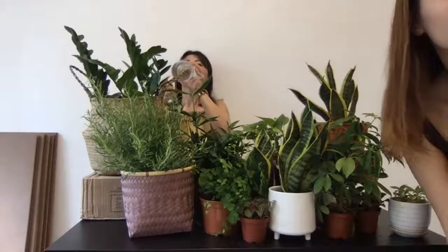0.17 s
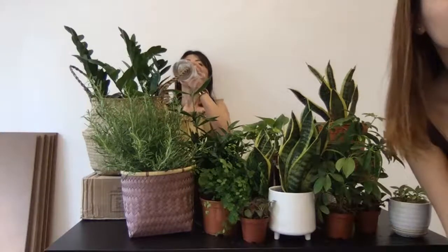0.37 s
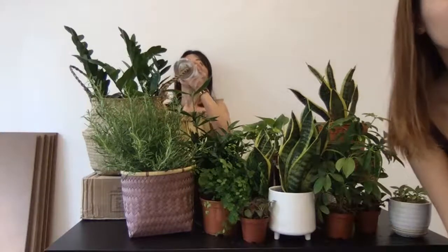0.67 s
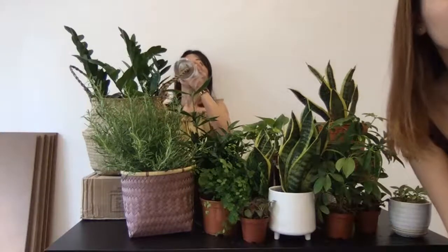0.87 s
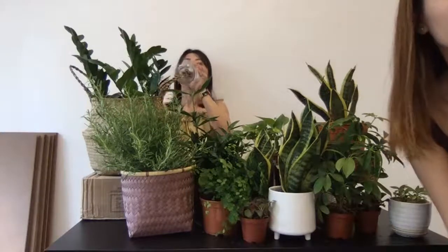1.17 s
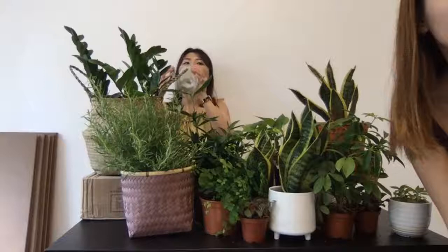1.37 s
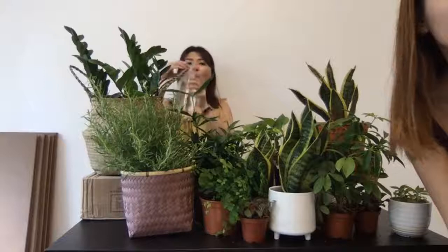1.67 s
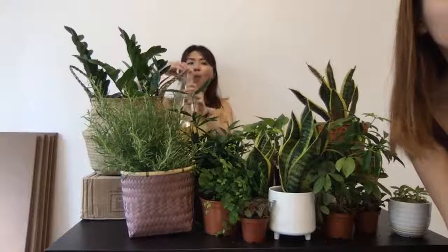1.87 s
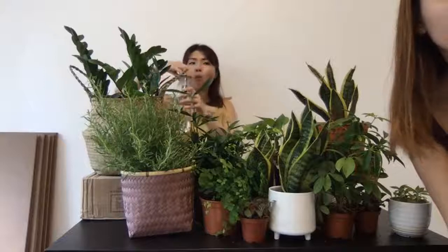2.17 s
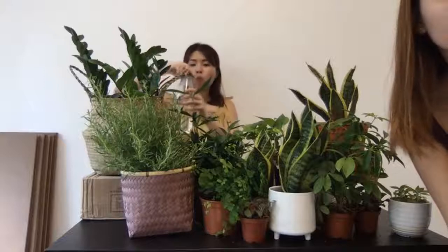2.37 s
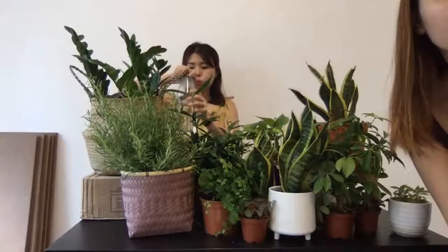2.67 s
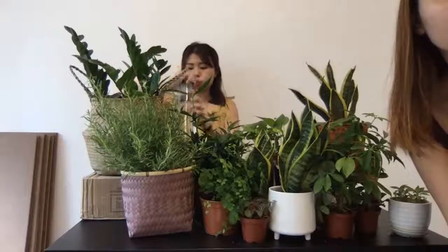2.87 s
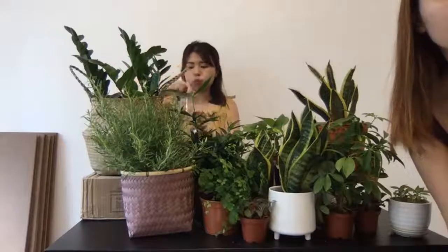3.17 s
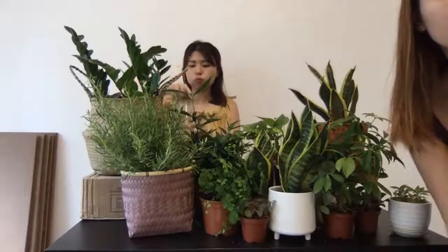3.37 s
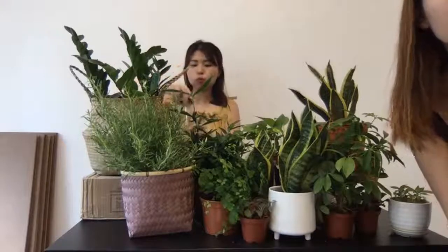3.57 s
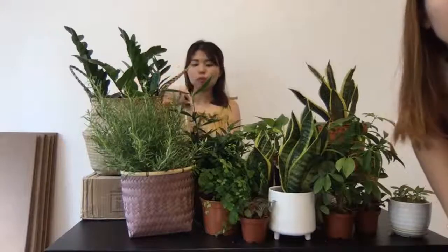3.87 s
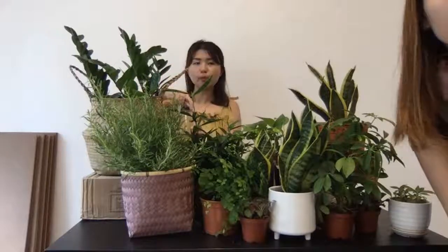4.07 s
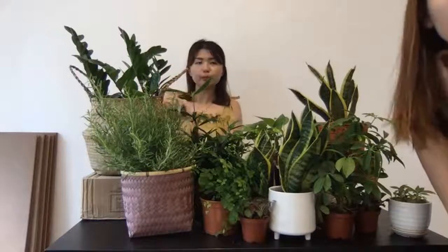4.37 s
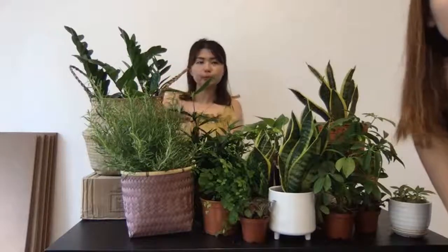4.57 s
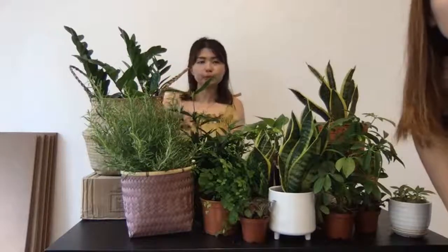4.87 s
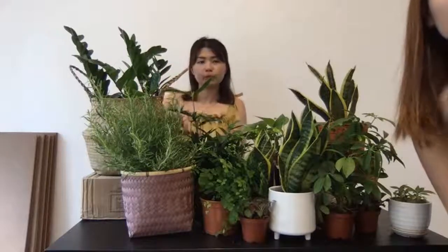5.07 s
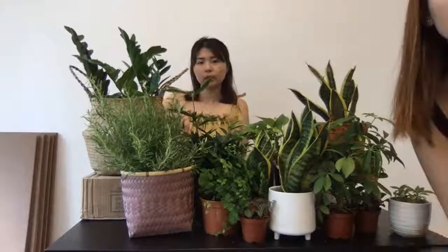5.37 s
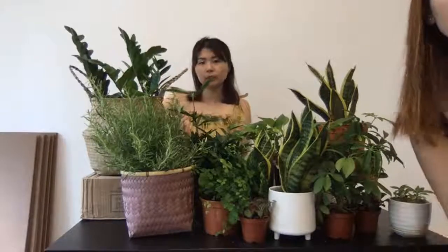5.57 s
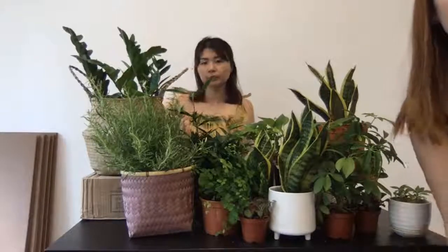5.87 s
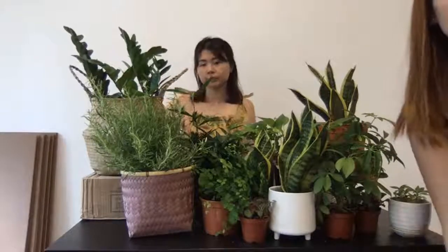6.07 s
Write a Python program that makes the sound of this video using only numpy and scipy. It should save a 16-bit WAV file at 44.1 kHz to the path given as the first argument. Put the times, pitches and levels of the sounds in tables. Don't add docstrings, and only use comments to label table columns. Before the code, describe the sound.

Faint squeak and glass handling clicks, then two rattling, ringing set-downs on wood, a dull hard knock, a soft tap and tiny snaps.

```python
import sys
import numpy as np
from scipy import signal
from scipy.fft import rfft, irfft, next_fast_len
from scipy.io import wavfile
from scipy.ndimage import uniform_filter1d, map_coordinates

SR = 44100
rng = np.random.default_rng(int(sys.argv[2]) if len(sys.argv) > 2 else 0)


def bounce(signal):
    frames = np.transpose(np.atleast_2d(signal))
    limited = np.clip(frames, -1, 1)
    pcm = np.round(limited * 32767).astype(np.int16)
    wavfile.write(sys.argv[1], SR, pcm)


def boost(x):
    u = np.asarray(x, float) / 20
    return 10 ** u


N = 273640
TIME = np.arange(N) / SR

# (time [s], level [dB])
ROOM_LEVEL = [(0, -78), (.55, -79.5), (.65, -64), (.9, -76.5), (1.42, -75.5), (1.6, -59), (1.95, -56),
              (2.5, -57.5), (2.95, -68.5), (3.4, -74), (3.6, -52.5), (3.8, -57), (4.3, -68), (4.75, -59.5),
              (5.1, -65.5), (5.48, -81), (5.75, -62), (6.2, -64.5)]
# (time [s], level [dB], gate closes after [s], brightness [dB/kHz])
KNOCK_BLOWS = [
    (5.53, -26, .006, -0.68),
    (5.534, -13.5, 0.14, -1.3),
]
# (frequency [Hz], level in first clink [dB], level in second clink [dB], extra fade [dB/s])
UPPER_RINGS = [(473, -7, -14, -8), (1093, -8, -20, 20), (1217, -14, -9, 25), (1330, -4, -19.5, 25),
               (1550, 1, -6, 19.5), (1561, -14, 6, 19.5), (3690, -8, -22, 30), (4274, -6, -5, 22),
               (4323, -12, -1, 22), (4440, -9, -8, 22), (4530, -3, -4, 22), (5125, -15, -22, 22),
               (5636, -14, -19, 5), (6660, -13, -13, 19.5), (6770, -10, -17, 40), (7540, -20, -19, 30),
               (8430, -20, -18, 35), (9320, -15, -19, 21.5), (9480, -13, -22, 23), (10030, -22, -30, 35),
               (10200, -20, -21, 30.5), (10560, -18, -30, 30), (11350, -17, -36, 30), (12350, -21, -36, 30),
               (13150, -25, -38, 30), (14500, -26, -40, 40), (15100, -26, -40, 30)]


def unit(x):
    return x / np.sqrt(np.mean(x ** 2) + 1e-20)


def curves(rows):
    s, *columns = np.transpose(rows)
    return [np.interp(TIME, s, column) for column in columns]


def wobble(rate, size=N):
    knots = rng.standard_normal(int(size * rate / SR) + 4)
    return map_coordinates(knots, [TIME[:size] * rate])


def colour(points):
    f, db = np.transpose(points)
    return lambda hz: boost(np.interp(np.log(hz + 1), np.log(f + 1), db))


def resonances(modes):
    def response(f):
        return sum(boost(db) * (f * w / (c * c - f * f + 1j * f * w)) ** 2 for c, w, db in modes)
    return response


def noise(response, size=N):
    m = next_fast_len(size + 4096)
    spectrum = rfft(rng.standard_normal(m)) * response(np.fft.rfftfreq(m, 1 / SR))
    return unit(irfft(spectrum, m)[:size])


def ring(hz, smear, flutter_db, size=N):
    phase = 2 * np.pi * hz * TIME[:size] + smear * wobble(45, size=size)
    return np.sqrt(2) * np.sin(phase) * boost(flutter_db * wobble(60, size=size))


def add(track, s, sound):
    part = track[round(s * SR):][:len(sound)]
    part += sound[:len(part)]


def lumps(rows):
    t = TIME[::64]
    s, *dbs, fade = np.transpose(rows)[:, :, None]
    distance = np.where(t < s, (s - t) / 0.6, t - s)
    loss_db = 10 * distance / fade
    return [np.interp(TIME, t, np.sqrt(np.sum(boost(db - loss_db) ** 2, axis=0))) for db in dbs]


def dulled(x, age, tilt_db, fade_db):
    hz, t, z = signal.stft(x, SR, nperseg=512)
    khz = hz[:, None] / 1000
    streaks = unit(uniform_filter1d(rng.standard_normal(z.shape), 14, 1))
    slope_db = tilt_db - fade_db * np.interp(t, TIME[:len(x)], age)
    gain = boost(khz * slope_db + 3.7 * streaks)
    return signal.istft(z * gain, SR, nperseg=512)[1][:len(x)]


def struck(blows, modes, air, rise, t60, ring_db, crack_db, fade_db):
    track, t = np.zeros(N), TIME[:SR // 2]
    for s, db, gate, tilt_db in blows:
        attack = 1 - np.exp(-(t / rise) ** 2)
        decay = boost(db - 60 * t / t60 - 200 * np.clip(t - gate, 0, None))
        crack = 1 + boost(crack_db - 60 * t / 0.012)
        body = boost(ring_db) * noise(resonances(modes), size=len(t))
        body = body + noise(colour(air), size=len(t))
        flutter = boost(0.89 * wobble(120, size=len(t)))
        add(track, s, attack * decay * crack * dulled(body, t, tilt_db, fade_db) * flutter)
    return track


def patchy(x, depth_db):
    z = signal.stft(x, nperseg=1024)[2]
    field = uniform_filter1d(rng.standard_normal(z.shape), 4, 0)
    field = uniform_filter1d(field, 4, 1)
    return unit(signal.istft(z * boost(depth_db * unit(field)), nperseg=1024)[1][:N])


def room():
    # (frequency [Hz], level [dB per Hz])
    low_air = [(30, -38.5), (70, -14), (110, -3.5), (170, 0), (260, -4), (400, -17), (700, -29.5),
               (1100, -56)]
    mid_air = [(400, -34), (700, -1), (1050, 0), (1600, -9), (2600, -11.5), (4000, -15.5), (6000, -22),
               (10000, -29.5), (16000, -37)]
    hiss = [(25, 31), (60, 18.5), (300, 5), (3000, 2.5), (16000, -6)]
    # (frequency [Hz], level [dB])
    fan = [(1500, -80)]
    # (time [s], level [dB], time to fade 10 dB [s])
    thumps = [
        (1.6, -60.5, 0.1),
        (2.5, -51.5, 0.44),
        (3.58, -39.5, 0.11),
        (4.45, -48.5, 0.1),
        (5.72, -41, 0.09),
    ]
    gate_db, = curves(ROOM_LEVEL)
    low_size = boost(gate_db + 0.7) + lumps(thumps)[0]
    low = boost(9.5) * low_size * patchy(noise(colour(low_air)), 3.6)
    mid = boost(gate_db + 0.5) * patchy(noise(colour(mid_air)), 3.0)
    whine_fade_db = ((TIME - 2.85) / 0.38) ** 2
    whine = sum(boost(db - whine_fade_db) * ring(hz, .8, 6.8) for hz, db in fan)
    return low + mid + whine + boost(-85.0) * noise(colour(hiss))


def table_hum():
    # (time [s], deep mode level [dB], hum level [dB], time to fade 10 dB [s])
    nudges = [(.18, -82, -58.5, 0.1), (.68, -54.5, -67, 0.11), (1.09, -49, -38, 0.037),
              (1.25, -48, -22.5, 0.035), (1.51, -45.5, -36, 0.07), (1.88, -44, -33, 0.21),
              (2.03, -59, -18.5, 0.053), (2.11, -28, -24.5, 0.026), (2.46, -34.5, -27.5, 0.028),
              (2.52, -34.5, -63, 0.2), (2.68, -41.5, -39.5, 0.03), (2.9, -46, -40.5, 0.053),
              (3.13, -41, -51.5, .07), (3.21, -47.5, -41, .025), (3.3, -34.5, -47, 0.029),
              (3.51, -32.5, -33, 0.089), (3.64, -30, -40, 0.11), (3.9, -40.5, -48.5, 0.43),
              (4.51, -40.5, -47, 0.07), (4.95, -40.5, -53, 0.098), (5.21, -43, -46, 0.088),
              (5.575, -39, -8, 0.067), (5.69, -26, -18.5, 0.042), (5.92, -36, -64.5, 0.1)]
    # deep, hum, hum after the knock (frequency [Hz])
    table_hz = [98.1, 127.3, 165.1]
    # (frequency [Hz], level [dB], time to fade 60 dB [s])
    board_ring = [(253, -14.5, 1.05), (92, -32, 0.4), (129, -24, .7), (312, -23, .8), (441, -26, .8),
                  (727, -31, .42), (880, -44, 2.5), (942, -32, .5), (1114, -25, .4)]
    rest_db, = curves(ROOM_LEVEL)
    deep_size, hum_size = lumps(nudges)
    hum_size = hum_size + boost(rest_db + 7.5)
    deep_hz, hum_hz, knock_hz = table_hz
    age = TIME - KNOCK_BLOWS[1][0]
    knocked = 1 - np.exp(-(np.clip(age, 0, None) / 0.0088) ** 2)
    deep = deep_size * ring(deep_hz, 0.62, 1.8)
    hum = (1 - knocked) * ring(hum_hz, 1.0, 1.5) + (0.28 + 0.59 * knocked) * ring(knock_hz, 0.41, 2.2)
    hum += boost(-18.0) * noise(resonances([(230.0, 32, 0)]))
    lifted = np.maximum(knocked, np.clip(-age / 0.9, 0, 1))
    hum *= hum_size * np.where(age > -.3, lifted, 1)
    after = age[age >= 0]
    fall_db = 150 * np.clip(after - .2, 0, None)
    board = sum(boost(db - 60 * after / t60 - fall_db) * ring(hz, 0.35, 2.5, size=len(after))
                for hz, db, t60 in board_ring)
    return deep + hum + knocked * np.pad(board, (N - len(after), 0))


def squeak():
    # (time [s], level [dB], gate closes after [s], brightness [dB/kHz])
    blows = [
        (.562, -42, .06, -0.93),
        (.576, -45.5, 0.012, 0.99),
        (.595, -34.5, 0.04, -2),
    ]
    # (frequency [Hz], width [Hz], level [dB])
    modes = [(4490, 51, -13), (5150, 67, 6), (5860, 46, 1), (8140, 97, -9), (10000, 40, -17),
             (9800, 170, -14)]
    # (frequency [Hz], level [dB per Hz])
    air = [(2060, -86), (3500, -56), (4760, -28), (5370, 8.5), (6800, -18), (9610, -3), (10600, -31),
           (13000, -51)]
    return struck(blows, modes, air, rise=0.0024, t60=0.22, ring_db=-1.5, crack_db=-1, fade_db=3.6)


def touches():
    # (time [s], level [dB], frequency [Hz], fade time [s])
    ticks = [(1.715, -50, 5450, 0.12), (1.925, -41, 5250, .22), (1.84, -50, 9150, .2),
             (3.7, -52, 9050, .06), (1.793, -44, 9130, 0.07), (1.838, -41, 5150, 0.15),
             (2.225, -59, 9300, 0.21), (2.621, -43, 5300, 0.08), (3.715, -45, 10140, .086),
             (5.113, -43.5, 5275, 0.21), (5.127, -44, 5600, 0.09), (5.543, -51, 6200, .2),
             (5.545, -57, 6600, 0.29), (5.65, -57, 5700, 0.074), (5.534, -37.5, 4280, 0.26),
             (5.532, -36, 3810, 0.27), (6.085, -45.5, 2800, 0.15), (6.09, -55, 12900, .06)]
    rubs = [
        (.64, -61.5, 1494, .33),
        (.788, -53.5, 2760, 0.2),
        (2.098, -46.5, 3078, 0.21),
        (4.875, -41, 2830, 0.19),
    ]
    thuds = [
        (.59, -61, 1020, 0.32),
        (1.79, -32, 2900, .12),
        (1.833, -35, 2700, .16),
        (1.83, -31, 382, 0.24),
        (3.49, -24.5, 260, 0.89),
        (3.7, -40, 1100, .3),
        (3.718, -35.5, 4840, 0.15),
        (4.35, -35.5, 290, .6),
        (4.839, -50, 3500, 0.26),
        (4.895, -45.5, 1970, 0.32),
    ]
    rim = [
        (3.548, -24, 5656, .47),
    ]
    # (time [s], level [dB], fade time [s])
    cap_ticks = [
        (1.84, -40, 0.33),
        (1.925, -32.5, 0.11),
        (2.085, -50, 0.13),
        (2.17, -51, 0.089),
        (2.216, -39, 0.15),
        (2.317, -42.5, 0.068),
        (3.7, -39, 0.31),
        (2.354, -35, .14),
        (2.42, -39, .3),
    ]
    # frequency [Hz], width [Hz]
    cap_edge = (3690, 70)
    track, t = np.zeros(N), TIME[:SR // 3]
    edge_hz, edge_width = cap_edge
    edge = [(s, db, edge_hz, t60) for s, db, t60 in cap_ticks]
    kinds = [(ticks, 21, .003), (rubs, 15, .025), (thuds, 5.5, .007), (rim, 225, .0054),
             (edge, edge_hz / edge_width, .002)]
    for rows, sharp, rise in kinds:
        for s, db, hz, t60 in rows:
            tone = noise(resonances([(hz, hz / sharp, 0)]), size=len(t))
            decay = boost(db - 20 * t / t60 - 140 * (t / t60) ** 2)
            add(track, s, tone * (1 - np.exp(-t / rise)) * decay)
    return track


def cap_click():
    # (time [s], level [dB], gate closes after [s], brightness [dB/kHz])
    blows = [
        (1.546, -53, .006, 1.6),
        (1.552, -17, 0.2, .1),
        (1.7, -60, 0.0082, 1.6),
    ]
    # (frequency [Hz], width [Hz], level [dB])
    modes = [(1103, 170, -18.5), (1960, 120, -17), (2560, 50, 0.5), (2640, 60, 0.3), (2755, 60, 0.3),
             (2962, 48, -9), (3560, 110, -15), (4720, 70, -8.5), (4880, 40, -12), (5450, 50, -5),
             (8166, 200, -23), (9320, 60, -16), (9720, 70, -16)]
    # (frequency [Hz], level [dB per Hz])
    air = [(350, -57), (1630, -27.5), (2250, -14), (2670, -1.5), (3260, -17), (5450, -19), (6240, -40),
           (9610, -29), (16000, -44)]
    return struck(blows, modes, air, rise=.0015, t60=.47, ring_db=3.5, crack_db=6, fade_db=9)


def neck_bumps():
    # (time [s], level [dB], gate closes after [s], brightness [dB/kHz])
    blows = [
        (1.795, -46, 0.067, 0.061),
        (1.835, -42, 0.075, 1.6),
        (1.923, -35, 0.06, 0.28),
        (2.085, -48, 0.09, -3.4),
    ]
    # (frequency [Hz], width [Hz], level [dB])
    modes = [(370, 79, -13), (1010, 300, -18), (2450, 540, -6.5), (2720, 58, 1.5), (2750, 280, -13)]
    # (frequency [Hz], level [dB per Hz])
    air = [(60, -60), (180, -24), (300, 17), (1410, -37), (2700, 9.5), (3760, -13), (4230, -35), (5250, -8),
           (6200, -24), (16000, -45)]
    return struck(blows, modes, air, rise=0.0022, t60=0.69, ring_db=2.7, crack_db=3, fade_db=17.0)


def cap_seats():
    # (time [s], level [dB], gate closes after [s], brightness [dB/kHz])
    blows = [
        (2.218, -56, 0.06, 0.73),
        (2.317, -53.5, 0.046, 0.37),
        (2.358, -44, 0.018, 2),
        (2.366, -20.5, 0.087, 0.01),
    ]
    # (frequency [Hz], width [Hz], level [dB])
    modes = [(1023, 52, -7), (2200, 350, -3.5), (3000, 19, -9), (3700, 36, 3.5), (5230, 70, -9),
             (8550, 32, -28), (8850, 48, -18), (11020, 370, -20)]
    # (frequency [Hz], level [dB per Hz])
    air = [(330, -43), (750, -8), (994, -2.5), (1230, -15), (3580, -10), (4310, -30), (5030, -15),
           (6540, -28.5), (11200, -33.5), (16000, -46)]
    return struck(blows, modes, air, rise=0.0041, t60=0.33, ring_db=-4.5, crack_db=-3.5, fade_db=11)


def bounces(contacts, t, grip, loss):
    fade_db, bend_db, rise = loss
    size = 0
    for k, (s, db, side) in enumerate(contacts):
        age = np.clip(t - s, 0, None)
        new = 1 - np.exp(-(age / rise) ** 2) if k else 1
        swing = boost(db - fade_db * grip * age - bend_db * (grip * age) ** 2)
        size = size * (1 - new) + np.sign(side) * new * swing
    return size


def clink(contacts, low_swings, mid_swings, gain, upper_levels, grip, twin_share_db, tilt_db):
    # (frequency [Hz], level [dB])
    low_ring = [(882, 0.002)]
    second_ring = [(2331, -3.5), (2353, -7)]
    # (frequency [Hz], level [dB per Hz])
    rattle_colour = [(90, -48.5), (300, -20), (600, -7), (1000, 2), (1500, -7), (2300, -2), (3000, -14),
                     (4500, -13.5), (7000, -27), (11000, -27.5), (16000, -35)]
    low_loss = (30, .1, .018)
    mid_loss = (90, 220, .01)
    upper_loss = (70, 400, .0035)
    rattle_loss = (80, 210, .004)
    start, stop = round(contacts[0][0] * SR), round(gain[-1][0] * SR)
    n = stop - start
    age, t = TIME[:n], TIME[start:stop]
    low_size = bounces(low_swings, t, grip, low_loss)
    second_size = bounces(mid_swings, t, grip, mid_loss)
    upper_size = bounces([(s, db, 1) for s, db, _ in contacts], t, grip, upper_loss)
    rattle_size = bounces([(s, db, 1) for s, _, db in contacts], t, grip, rattle_loss)
    fresh = np.exp(-(age / 0.24) ** 2)
    low = sum(boost(db) * ring(hz, 0.23 + .5 * fresh, 0.87 * fresh, size=n) for hz, db in low_ring)
    halo = boost(-16.0) * noise(resonances([(882, 180, 0)]), size=n)
    (main_hz, main_db), (twin_hz, twin_db) = second_ring
    mid = boost(main_db) * ring(main_hz, 0.14 + 0.6 * fresh, 1.1 * fresh, size=n)
    mid = mid + boost(twin_db + twin_share_db) * fresh * ring(twin_hz, 0.7, 2.5, size=n)
    brief = SR // 2
    upper = sum(boost(db - fade * grip ** 3 * age[:brief]) * ring(hz, 1.3, 5.2, size=brief)
                for (hz, *_, fade), db in zip(UPPER_RINGS, upper_levels))
    upper = np.pad(upper, (0, n - brief))
    rattle = dulled(noise(colour(rattle_colour), size=n), age, tilt_db, 4.1)
    sound = low_size * (low + halo) + boost(2.0) * second_size * mid
    sound = sound + upper_size * upper + boost(12.5) * rattle_size * rattle
    edges = np.clip(age / 0.0026, 0, 1) * np.clip(age[::-1] / 0.0073, 0, 1)
    return np.pad(sound * edges * boost(curves(gain)[0][start:stop]), (start, N - stop))


def glass():
    # (time [s], upper rings level [dB], rattle level [dB])
    first_contacts = [
        (3.4265, -25, -27.5),
        (3.458, -25, -29),
        (3.5, -31, -35.5),
        (3.536, -21, -26.5),
        (3.6, -29, -33),
        (3.655, -41, -42),
        (3.705, -46, -45),
    ]
    second_contacts = [
        (4.32, -31, -32),
        (4.326, -25, -30),
        (4.35, -27, -33.5),
        (4.395, -28, -36),
        (4.43, -30, -38),
        (4.47, -33, -44),
        (4.52, -41, -50),
    ]
    # (time [s], level [dB], side of the swing [+1 or -1])
    first_low = [(3.4265, -8, 1), (3.47, -10, 1), (3.51, -8, 1), (3.535, -13, -1), (3.558, -10, -1),
                 (3.578, -20, -1), (3.59, -11, -1), (3.608, -15.5, 1)]
    second_low = [ (4.32, -4.5, 1), (4.345, -5, 1), (4.379, -15, -1), (4.455, -13.5, 1)]
    first_mid = [(3.4265, -16, 1), (3.452, -9.5, 1), (3.48, -8.5, 1), (3.508, -15, -1), (3.545, -8, -1),
                 (3.573, -10, 1), (3.605, -8, 1), (3.64, -12, 1), (3.665, -19, 1), (3.69, -27, -1),
                 (3.735, -26, -1), (3.765, -33, -1), (3.79, -40, 1)]
    second_mid = [(4.32, -18, 1), (4.326, -13, -1), (4.36, -14, -1), (4.39, -22, 1), (4.42, -18, 1),
                  (4.467, -16.5, -1), (4.505, -21, -1), (4.55, -30, -1), (4.59, -39, 1)]
    # (time [s], level [dB])
    first_gain = [(3.428, -1.33), (3.69, -1.5), (3.87, -3), (4.03, 2), (4.15, -4), (4.318, -22.5)]
    second_gain = [(4.32, -2.85), (4.43, -1.5), (4.469, -11.5), (4.498, 0.5), (4.549, -4), (4.83, -0.1),
                   (4.895, -10), (5.0, -15), (5.4, -29)]
    _, first_upper, second_upper, _ = np.transpose(UPPER_RINGS)
    first = clink(first_contacts, first_low, first_mid, first_gain, first_upper,
                  grip=1.02, twin_share_db=-10, tilt_db=.35)
    second = clink(second_contacts, second_low, second_mid, second_gain, second_upper,
                   grip=1.277, twin_share_db=3, tilt_db=-.3)
    return first + second


def table_knock():
    # (frequency [Hz], width [Hz], level [dB])
    modes = [(320, 82, -7), (500, 48, -6), (744, 47, -8), (1050, 120, -7), (1400, 90, -11.5),
             (2050, 230, -18), (3380, 170, -25.5)]
    # (frequency [Hz], level [dB per Hz])
    air = [(40, -60), (120, -20), (230, -4), (620, -15.5), (1140, -11), (2570, -16), (2800, -45),
           (4600, -44.5), (5000, -73), (16000, -89)]
    return struck(KNOCK_BLOWS, modes, air, rise=0.0022, t60=0.66, ring_db=0, crack_db=1, fade_db=39)


def finger_tap():
    # (time [s], level [dB], gate closes after [s], brightness [dB/kHz])
    blows = [
        (5.831, -35, 0.049, -0.5),
    ]
    # (frequency [Hz], width [Hz], level [dB])
    modes = [(811, 130, -1), (2360, 440, -11), (3500, 110, -25), (4250, 280, -12.5), (6130, 300, -38)]
    # (frequency [Hz], level [dB per Hz])
    air = [(300, -17), (800, -3.5), (1500, -47), (2500, -29), (4500, -35), (5000, -55), (9000, -36),
           (11000, -22), (15000, -40)]
    return struck(blows, modes, air, rise=0.008, t60=0.61, ring_db=7.5, crack_db=-9, fade_db=23)


def snaps():
    # (time [s], level [dB], gate closes after [s], brightness [dB/kHz])
    blows = [
        (5.988, -42, 0.012, -1.1),
        (5.997, -33.5, 0.036, 0.16),
        (6.085, -54.5, 0.071, -0.92),
    ]
    # (frequency [Hz], width [Hz], level [dB])
    modes = [(2060, 510, -8), (2990, 740, 0.5), (4790, 480, -0.5), (6930, 310, -10)]
    # (frequency [Hz], level [dB per Hz])
    air = [(470, -52), (862, -20), (1340, -33), (1700, -6), (2730, -3.5), (6740, -11.5), (7830, -20.5),
           (16000, -28)]
    return struck(blows, modes, air, rise=0.002, t60=0.97, ring_db=-3.0, crack_db=10, fade_db=14)


def scene():
    background = room() + table_hum()
    handling = squeak() + touches() + cap_click() + neck_bumps() + cap_seats()
    ending = table_knock() + finger_tap() + snaps()
    return (background + handling + glass() + ending)[None]


def roll_off(x):
    return signal.sosfilt(signal.butter(12, 16810, fs=SR, output="sos"), x)


def record(dry):
    thin = signal.sosfilt(signal.butter(2, 70, "high", fs=SR, output="sos"), dry)
    held = thin / (1 + np.abs(thin / 1.1) ** 4) ** (1 / 4)
    mix = signal.sosfilt(signal.ellip(10, .5, 70, 15750, fs=SR, output="sos"), held)
    return roll_off(mix)


dry = scene()
out = record(dry)
bounce(out)
```